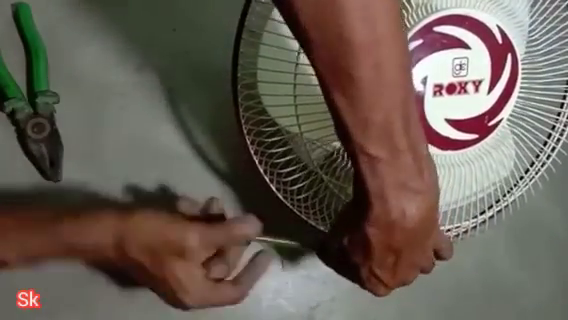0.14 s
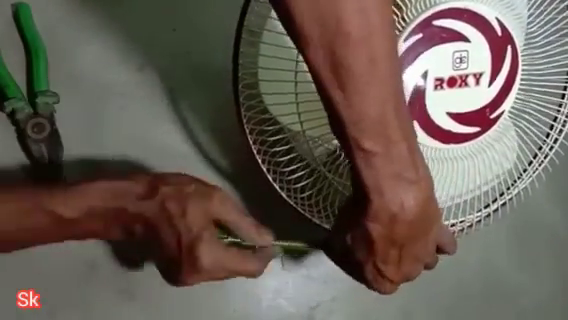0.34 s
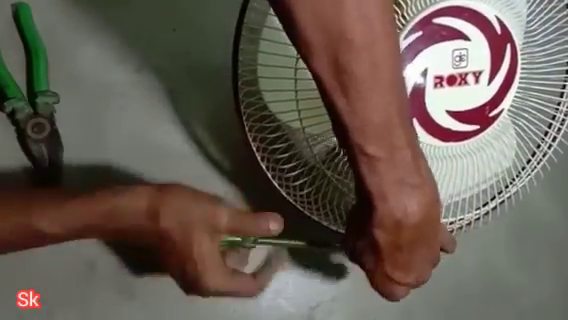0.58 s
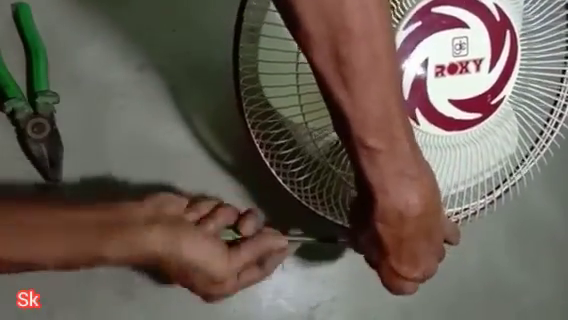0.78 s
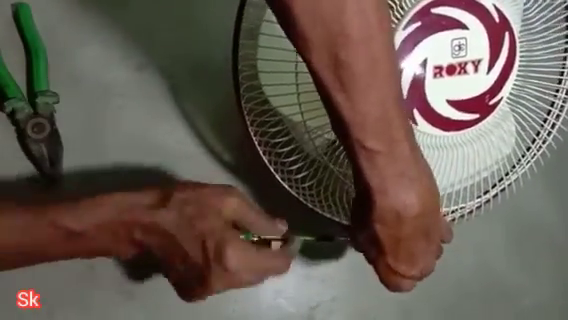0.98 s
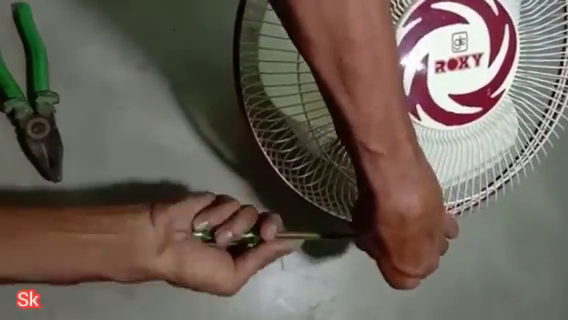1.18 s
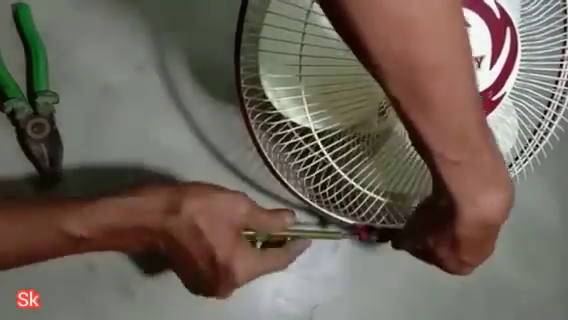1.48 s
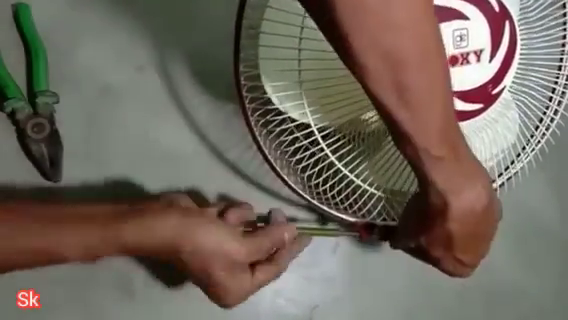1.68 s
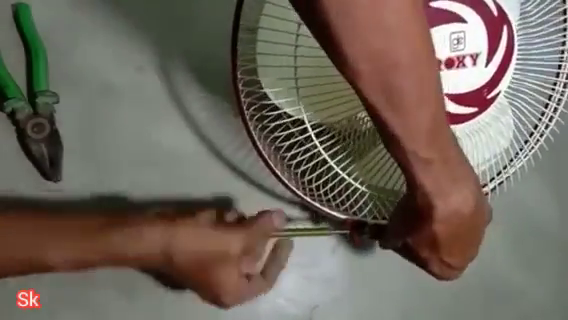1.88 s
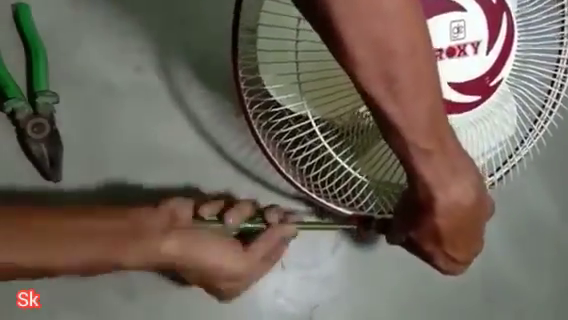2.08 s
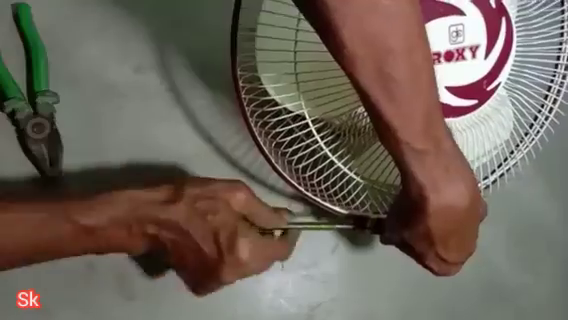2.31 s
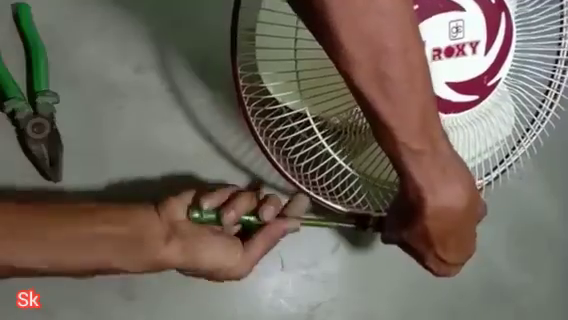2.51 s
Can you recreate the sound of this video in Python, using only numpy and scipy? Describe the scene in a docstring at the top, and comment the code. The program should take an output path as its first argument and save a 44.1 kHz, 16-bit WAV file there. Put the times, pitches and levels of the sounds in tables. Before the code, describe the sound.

Squeaky metal screw being turned in short strokes, shrill and scraping, close up in a ringing room

```python
"""A squeaky screw in a fan guard

A screwdriver turns a tight screw in the clamp of a wire fan guard, close to a phone, in a hard-floored room.
The thread sticks and slips at a fast rate. Regular slips make a squeal, a stack of harmonics; irregular slips
make a rough scrape, which is noise shaped by the guard. A thin whistle, one high tone, opens the first two turns.
Faint fuzzy tones and soft rustles are bands of noise. Sparse echoes make the room ring, over rumble and hiss."""
import sys
import numpy as np
from scipy import signal
from scipy.fft import rfft, irfft
from scipy.io import wavfile
from scipy.ndimage import uniform_filter1d

SR = 44100
rng = np.random.default_rng(int(sys.argv[2]) if len(sys.argv) > 2 else 0)


def master_out(mix):
    """Clip the mix to full scale and print it as 16-bit PCM to the path in sys.argv[1]."""
    frames = np.transpose(np.atleast_2d(mix))
    ceiling = np.clip(frames, -1, 1)
    pcm = np.round(ceiling * 32767).astype(np.int16)
    wavfile.write(sys.argv[1], SR, pcm)


def invert_db(level):
    """Linear amplitude ratio for a level in decibels (20 dB per decade), elementwise."""
    return 10 ** (np.asarray(level, dtype=float) / 20)


N = 116865  # length of the scene in samples
WOBBLE_S = 0.0015  # smoothing time of the fast pitch wobble


def evened(x):
    """Scales a sound to an rms (average strength) of 1."""
    return x / np.sqrt(np.mean(x ** 2) + 1e-20)


def read(points, hz):
    """Reads a curve over frequency, with straight lines between its points on a log axis."""
    f, value = np.transpose(points)
    return np.interp(np.log(hz + 1), np.log(f + 1), value)


def drift(count, s):
    """Random wandering of rms 1: noise smoothed twice over s seconds."""
    width = max(round(s * SR), 2)
    once = uniform_filter1d(rng.standard_normal(count), width)
    return evened(uniform_filter1d(once, width))


def band(count, hz, width_hz):
    """A band of noise of rms 1: white noise that gets weaker away from its middle frequency."""
    f = np.fft.rfftfreq(count, 1 / SR)
    weakening = 1 + ((f - hz) / width_hz * 2) ** 4
    return evened(irfft(rfft(rng.standard_normal(count)) / weakening, count))


def coloured(x, points):
    """Shapes a sound as the guard does: a broad colour, with the ringing modes of its wires on top."""
    # modes of the wires that the scrape rings: f/Hz, width/Hz, lift/dB (below 0: a dip)
    wires = [(2416, 24, 2.5), (2510, 36, -8), (2640, 31, 2.5), (3120, 20, 0), (3200, 24, -1),
             (3960, 41, -3), (4100, 66, 0), (5140, 48, 12), (6100, 59, 0), (6900, 70, 3.5)]
    hz = np.fft.rfftfreq(len(x), 1 / SR)
    rings = 1 + sum((invert_db(db) - 1) / (1 + ((hz - f) / width * 2) ** 2) for f, width, db in wires)
    return evened(irfft(rfft(x) * rings * invert_db(read(points, hz)), len(x)))


def unroll(rows):
    """Turns rows of a curve into its start time, soft ends and one value per sample for each column."""
    s, *columns = np.transpose(rows)
    t = np.arange(s[0], s[-1], 1 / SR)
    edge = np.clip(np.minimum(t - s[0], s[-1] - t) / 0.004, 0, 1)  # 4 ms ramps
    return s[0], edge, [np.interp(t, s, column) for column in columns]


def add(mix, s, sound):
    """Mixes a sound in from time s, in seconds."""
    part = mix[round(s * SR):][:len(sound)]
    part += sound[:len(part)]


def air():
    """Rumble and hiss: noise with a fixed colour, in which soft patches drift over time and pitch."""
    # colour of the background noise: f/Hz, relative level/dB
    air_colour = [(15, -50), (25, -20), (43, -22), (80, -4.5), (101, 2), (133, -1.5), (188, -12.5),
                  (290, -14), (458, -18), (510, -17.5), (553, -20), (616, -17.5), (851, -26.5), (923, -23),
                  (1000, -30), (1380, -22.5), (2070, -26.5), (2710, -29.5), (3550, -27), (5610, -29.5),
                  (7750, -26.5), (11600, -46), (15600, -43.5)]
    level_db, patch_db = -42.5, 1.5  # overall rms; rms of the patches
    frames, hz = N // 512 + 5, np.fft.rfftfreq(2048, 1 / SR)
    real, imaginary, patches = rng.standard_normal((frames, 1025, 3)).T
    patches = uniform_filter1d(patches, 20, 0)  # smooth over frequency
    patches = evened(uniform_filter1d(patches, 8, 1))  # smooth over time
    spectrum = (real + 1j * imaginary) * invert_db(read(air_colour, hz)[:, None] + patch_db * patches)
    noise = signal.istft(spectrum, nperseg=2048, noverlap=1536)[1][:N]
    return invert_db(level_db) * evened(noise)


def room(x):
    """The ringing room: sparse echoes of random sign, each band dying away at its own speed."""
    # how long the room rings: f/Hz, time to fall by 60 dB/s
    ring_times = [(500, 0.34), (1300, 0.62), (3500, 0.38), (9000, 0.37)]
    taps = np.zeros(SR)
    at = np.arange(200, SR - 20, 20)  # one echo in each 20 samples
    taps[at + rng.integers(0, 20, len(at))] = rng.choice([-1., 1.], len(at))
    hz, t, z = signal.stft(taps, SR, nperseg=256)
    fade = invert_db(-60 * t / read(ring_times, hz)[:, None])
    tail = signal.istft(z * fade, SR, nperseg=256)[1]
    return signal.fftconvolve(x, tail / np.linalg.norm(tail))[:N]


def rustle(middle, length, hz, width_hz, db):
    """A soft swell of noise, perhaps the hands rustling: a band of noise that rises and falls."""
    swell = np.hanning(round(length * SR))
    return middle - length / 2, invert_db(db) * swell * band(16384, hz, width_hz)[:len(swell)]


def add_rustles(mix):
    """Mixes in the soft swells of noise."""
    # swells of noise: middle/s, length/s, f/Hz, width/Hz, level before the swell/dB
    swells = [(1.78, .26, 380, 450, -49), (1.73, .12, 11000, 8000, -65), (2.6, .24, 550, 800, -51),
              (2.36, .1, 13500, 4000, -62)]
    for row in swells:
        add(mix, *rustle(*row))


def low_tone(start, length, hz, width_hz, db):
    """A faint fuzzy tone: a narrow band of noise with a quick start that fades."""
    t = np.arange(0, length, 1 / SR)
    rise = np.minimum(t / 0.0086, 1)
    fade = np.sqrt(1 - t / length)
    return start, invert_db(db) * rise * fade * band(8192, hz, width_hz)[:len(t)]


def add_low_tones(mix):
    """Mixes in the faint fuzzy tones."""
    # fuzzy tones: start/s, length/s, f/Hz, width/Hz, level before the fade/dB
    tones = [(0.235, 0.069, 2400, 90, -26.5), (0.442, 0.074, 784, 322, -35.5),
             (0.804, 0.091, 375, 92.5, -39.5), (0.809, 0.073, 1373, 80, -36), (0.946, 0.11, 807, 104, -42),
             (0.99, 0.09, 980, 101, -45), (1.096, 0.13, 604, 83, -45), (2.078, 0.081, 2197, 150, -47.5)]
    for row in tones:
        add(mix, *low_tone(*row))


def whistle(rows):
    """One high mode sings alone as a wobbling sine, with some fizz, a band of noise above it."""
    wobble = 0.012  # rms share of the pitch
    fizz_db, fizz_hz, fizz_width_hz = -9.5, 7080, 2600  # level against the sine
    start, edge, (hz, db) = unroll(rows)
    count = len(hz)
    wavering_hz = hz * (1 + wobble * drift(8192, WOBBLE_S)[:count])
    angle = 2 * np.pi * np.cumsum(wavering_hz) / SR
    fizz = invert_db(fizz_db) * band(8192, fizz_hz, fizz_width_hz)[:count]
    return start, edge * invert_db(db) * (np.sqrt(2) * np.sin(angle) + fizz)


def add_whistles(mix):
    """Mixes in the thin whistles as the screw breaks loose."""
    # one curve for each whistle: t/s, f/Hz, level of the sine/dB
    curves = [
        [(0.184, 5900, -38), (0.2, 5820, -30), (0.218, 5620, -21), (0.244, 5850, -25), (0.255, 5500, -36)],
        [(0.647, 6300, -35), (0.666, 6200, -20), (0.685, 6080, -21.5), (0.715, 6140, -19)],
    ]
    for rows in curves:
        add(mix, *whistle(rows))


def squeal(rows, colour, orders, unsteady):
    """Regular slips give harmonics that hop and chatter; irregular ones give a lumpy, coloured scrape."""
    flutter_db, flutter_s = 4, 0.0086  # each harmonic swells by itself
    hop_s, chatter_s = 0.008, 0.002  # smoothing times
    grit, grit_s = 0.2, 0.0022  # how much the scrape comes in lumps; smoothing time
    spray_db, spray_hz, spray_width_hz = -37.5, 13500, 7600  # raspy treble, level against the squeal
    start, edge, (hz, squeal_db, scrape_db) = unroll(rows)
    n, count = 16384, len(hz)  # noise is made n samples long, then cut to count
    wobble, hop, chatter_db = unsteady

    waver = wobble * drift(n, WOBBLE_S) + hop * np.tanh(2 * drift(n, hop_s))
    angle = 2 * np.pi * np.cumsum(hz * (1 + waver[:count])) / SR
    tone = np.zeros(count)
    for multiple, db in orders:
        strength = invert_db(db + flutter_db * drift(n, flutter_s)[:count])
        tone += strength * np.cos(multiple * angle + 2 * np.pi * rng.random())
    tone = tone * invert_db(chatter_db * np.tanh(drift(n, chatter_s))[:count])
    spray = invert_db(spray_db) * band(n, spray_hz, spray_width_hz)[:count]

    lumps = np.exp(grit * drift(n, grit_s))
    scrape = coloured(rng.standard_normal(n) * lumps, colour)[:count]
    return start, edge * (invert_db(squeal_db) * (evened(tone) + spray) + invert_db(scrape_db) * scrape)


def add_turns(mix):
    """Mixes in the five turns; a turn can break into a rougher or a second squeal."""
    # course of each squeal: t/s, slip rate/Hz, squeal level/dB, scrape level/dB
    turn_1 = [(.222, 953.5, -31, -37), (.235, 946.3, -23, -24.5), (.27, 928, -16, -23),
              (.31, 922, -19, -45), (.335, 927, -24, -32), (.36, 974, -24, -40), (.4, 984, -26.5, -47),
              (.43, 958, -23, -44), (.445, 913, -25.5, -42), (.5, 905, -36, -52)]
    turn_1_rough = [(.3, 931.6, -40, -26), (.345, 888, -20.5, -21.5), (.405, 868.5, -22, -17.5),
                    (.415, 807, -21, -20.5), (.45, 812, -22, -23.5), (.47, 848, -24, -23),
                    (.5, 847, -36.5, -30), (.53, 836, -39, -29)]
    turn_2 = [(.68, 1022, -44, -43), (.692, 1014, -22, -24), (.73, 1006, -12.5, -26), (.76, 1005, -15, -31),
              (.8, 984, -18, -24.5), (.83, 978, -37, -15.5), (.86, 1020, -41, -34)]
    turn_2_rough = [(.79, 981, -37, -39), (.808, 947, -25, -26), (.825, 915, -21, -27),
                    (.86, 906.6, -20, -20), (.9, 902.4, -19.5, -18.5), (.93, 889.6, -27, -21),
                    (.96, 879, -27, -26), (1.02, 879, -48, -31)]
    turn_2_upper = [(.86, 1005, -57, -60), (.878, 1020, -14.5, -54), (.9, 1019, -27, -52),
                    (.93, 1020, -22.5, -36), (.97, 1001, -27.5, -44), (1.02, 1006, -42, -56)]
    turn_3 = [(1.22, 472, -53, -70), (1.24, 478.4, -52, -44), (1.256, 516, -40.5, -41),
              (1.364, 508.5, -43, -39.5), (1.4, 509, -45.5, -64), (1.44, 490, -77, -73)]
    turn_4 = [(2.1, 1693, -58, -63), (2.115, 1677, -25.5, -34), (2.15, 1670, -31, -27),
              (2.2, 1675, -35, -29), (2.25, 1680, -42.5, -48), (2.27, 1700, -55, -65)]
    turn_4_fall = [(2.11, 1614, -45, -60), (2.12, 1544, -23.5, -41), (2.14, 1430, -27, -28),
                   (2.175, 1344, -28.5, -30.5), (2.19, 1300, -42, -42)]
    turn_5 = [(2.18, 1058, -30, -53), (2.192, 1050, -32, -29), (2.21, 1109, -31, -33.5),
              (2.235, 1170, -50, -30), (2.256, 1245, -33, -34), (2.29, 1249, -36, -34),
              (2.308, 1242, -41, -45), (2.318, 1113, -45, -29), (2.335, 1173, -23, -26.5),
              (2.36, 1169, -26.5, -32), (2.406, 1178, -34, -34.5), (2.435, 1154, -57, -49)]
    # colour of the guard under each grip: f/Hz, relative level/dB
    colour_1 = [(350, -66), (600, -56), (855, -32), (1090, -24.5), (1270, -14.5), (1690, -18.5), (2570, -2),
                (4030, -5), (4560, -10), (6760, -6.5), (8400, -23.5), (10200, -35), (15500, -39)]
    colour_2 = [(350, -63), (600, -24.5), (878, -52), (1030, -12), (1200, -46), (1320, -14.5),
                (1450, -23.5), (2190, -12.5), (2500, -8), (2720, -5), (4810, -7.5), (6670, -10.5),
                (15500, -44.5)]
    colour_3 = [(240, -57), (400, -10), (527, -1), (683, -34), (1020, -4), (1240, -28), (1540, -0.5),
                (2120, -11), (2320, -26), (3010, 2.5), (4420, -42), (7100, -13.5), (15500, -48)]
    colour_4 = [(470, -36), (800, -18.5), (1150, -31), (1640, -6.5), (2210, -23), (3020, 5), (3590, -11),
                (4220, -3), (5010, -19), (6840, -7.5), (8340, -14), (9920, -51), (15500, -49)]
    colour_5 = [(470, -65), (800, -23), (1120, -4.5), (1840, -45), (2100, 5), (2400, 8), (2910, -27),
                (3500, 0.5), (3960, -51), (4650, -19), (5340, -40), (5750, -34), (7740, -4.5), (15500, -96)]
    # strength of each harmonic: multiple of the slip rate, relative level/dB
    orders_1 = [(1, -18), (2, -9.5), (3, -8), (4, 2.5), (5, -14), (6, -6.5), (7, 1), (8, -9.5), (9, -36),
                (10, -15), (11, -18.5), (12, -30.5), (13, -36), (15, -35), (16, -28)]
    orders_1_rough = [(1, -37), (2, -20), (3, 5), (4, -15), (5, -20), (6, -5), (7, -11), (8, -6), (9, -6.5),
                      (11, -17.5), (12, -17)]
    orders_2 = [(1, -20.5), (2, -16.5), (3, 2), (4, -9.5), (5, -10), (6, -4), (7, -2.5), (8, -15.5),
                (9, -19.5), (10, -22), (11, -30.5), (12, -33), (15, -33)]
    orders_2_rough = [(1, -22), (2, -23), (3, 3), (4, -12), (5, -12), (6, -2.5), (7, -0.5), (8, -1),
                      (9, -4.5), (10, -17)]
    orders_2_upper = [(1, -18.5), (2, -11), (3, 1), (4, -8), (5, -19), (6, -20), (7, -25)]
    orders_3 = [(1, -10), (2, -23), (3, 0.5), (4, -4.5), (5, -13), (6, -24), (7, -7.5), (8, -18)]
    orders_4 = [(1, -8), (2, 1.5), (4, -8.5)]
    orders_4_fall = [(1, -15), (2, 1.5), (3, -1.5), (4, -11)]
    orders_5 = [(1, -13.5), (2, 1), (3, -6), (4, -2), (5, -3.5), (6, -18), (7, -29), (10, -34)]
    # unsteadiness: fast wobble/share of slip rate, hop/share of slip rate, chatter/dB
    unsteady_1 = (.012, .003, 3)
    unsteady_2 = (.009, .002, 3)
    unsteady_3 = (.035, .012, 4)
    unsteady_4 = (.019, .008, 4)
    unsteady_5 = (.012, .006, 5.5)
    unsteady_rough = (.01, .011, 4.5)

    add(mix, *squeal(turn_1, colour_1, orders_1, unsteady_1))
    add(mix, *squeal(turn_1_rough, colour_1, orders_1_rough, unsteady_rough))
    add(mix, *squeal(turn_2, colour_2, orders_2, unsteady_2))
    add(mix, *squeal(turn_2_rough, colour_2, orders_2_rough, unsteady_rough))
    add(mix, *squeal(turn_2_upper, colour_2, orders_2_upper, unsteady_rough))
    add(mix, *squeal(turn_3, colour_3, orders_3, unsteady_3))
    add(mix, *squeal(turn_4, colour_4, orders_4, unsteady_4))
    add(mix, *squeal(turn_4_fall, colour_4, orders_4_fall, unsteady_4))
    add(mix, *squeal(turn_5, colour_5, orders_5, unsteady_5))


def scene():
    """All the close sounds, their ringing in the room, and the background air."""
    close = np.zeros(N)
    add_rustles(close)
    add_low_tones(close)
    add_whistles(close)
    add_turns(close)
    wet_db = -5.5  # level of the room's ringing
    return (close + invert_db(wet_db) * room(close) + air())[None]


def band_limit(x):
    """A steep low-pass at the top of the band."""
    return signal.sosfilt(signal.butter(12, 15560, fs=SR, output="sos"), x)


def record(dry):
    """Removes the treble above an edge with a steep filter and returns the finished mix."""
    edge_hz = 15560
    lowpass = signal.firwin(511, edge_hz, window=("kaiser", 9), fs=SR)
    limited = signal.oaconvolve(dry, lowpass[None], "same")
    return band_limit(limited)


dry = scene()
out = record(dry)
master_out(out)
```